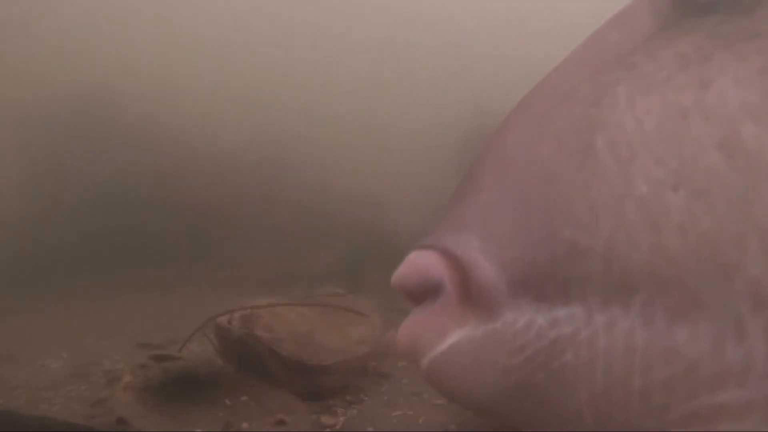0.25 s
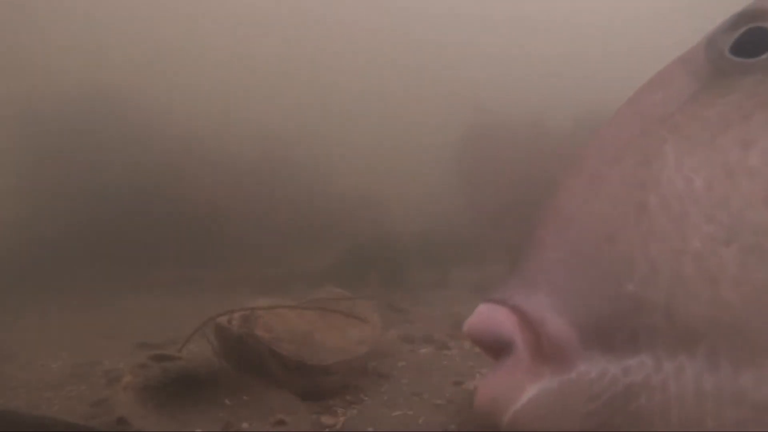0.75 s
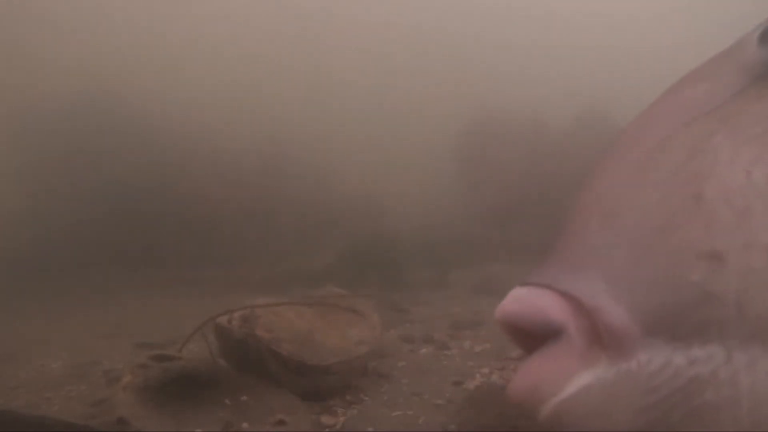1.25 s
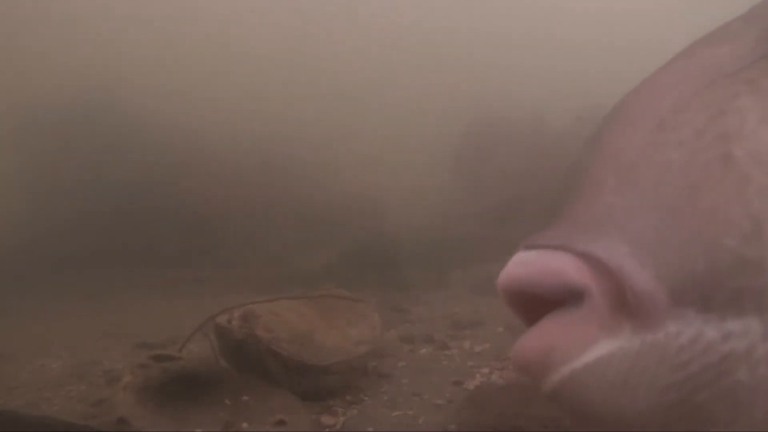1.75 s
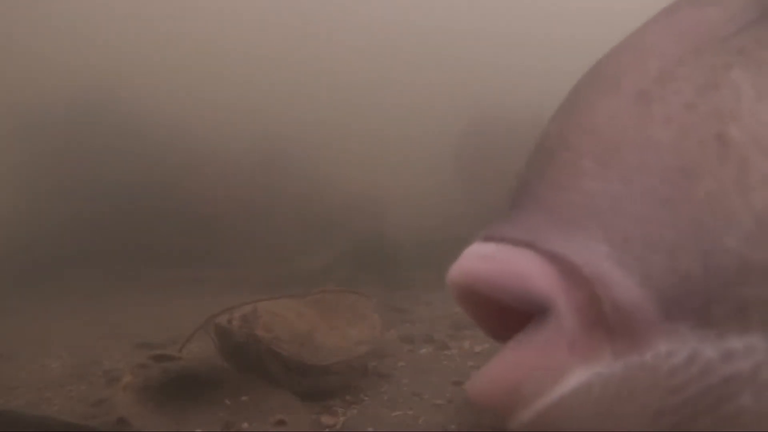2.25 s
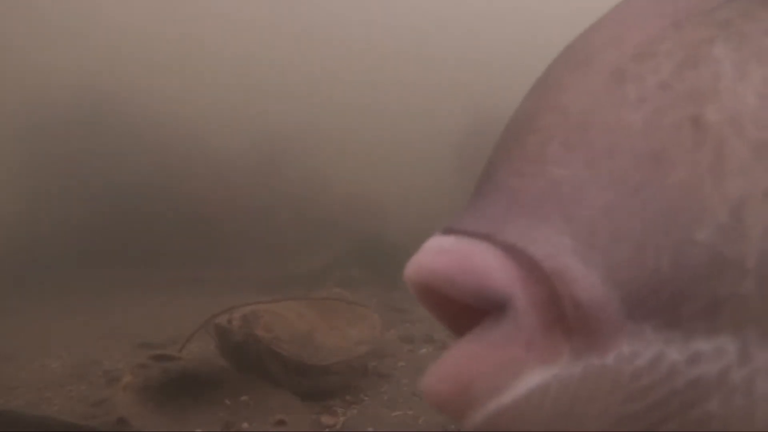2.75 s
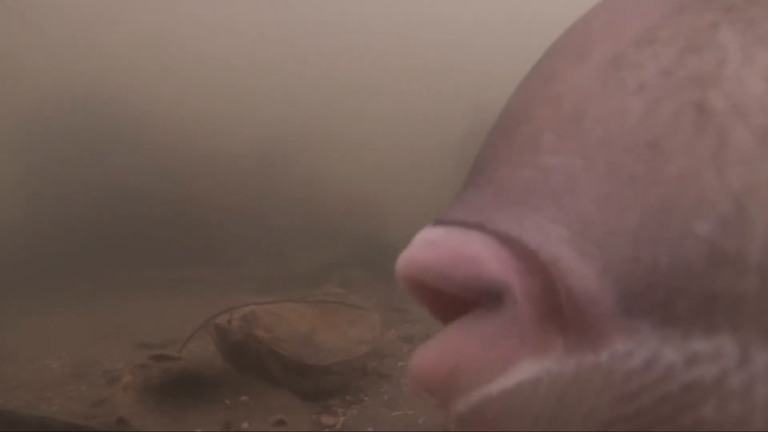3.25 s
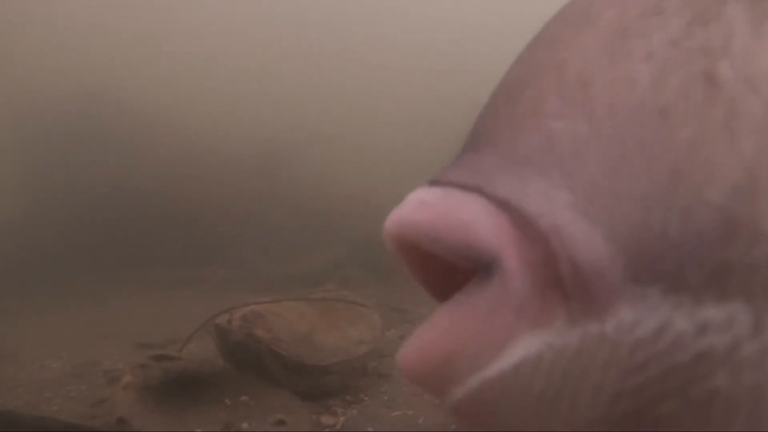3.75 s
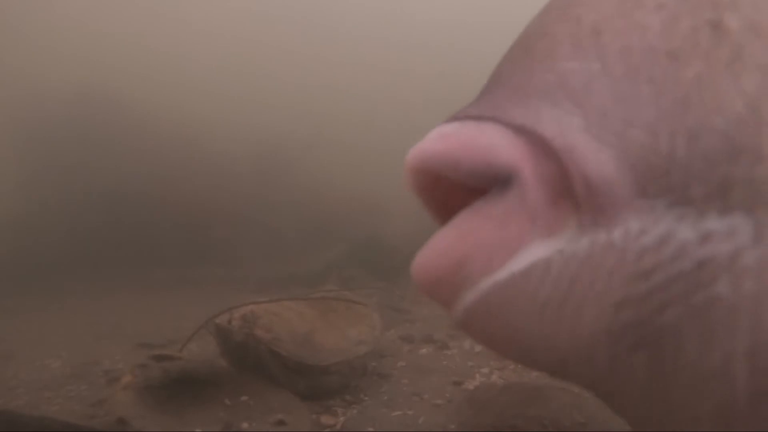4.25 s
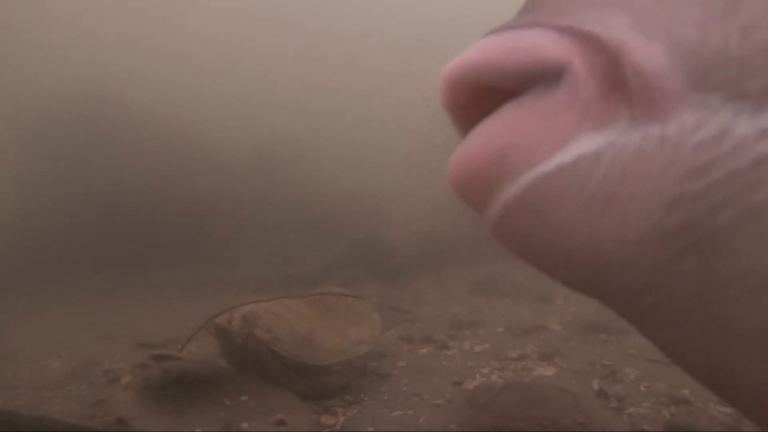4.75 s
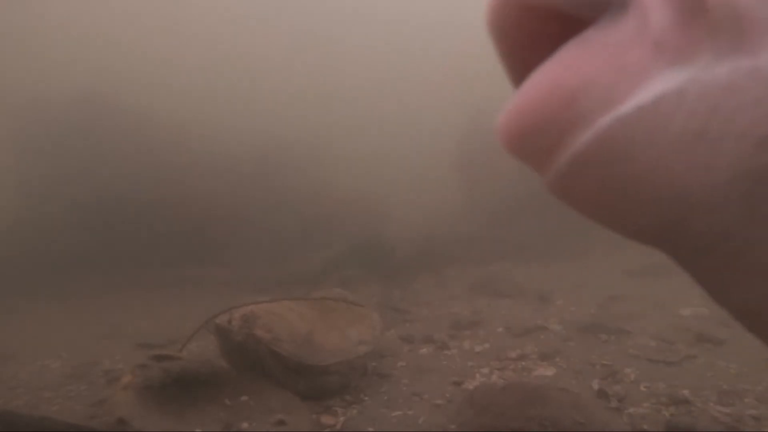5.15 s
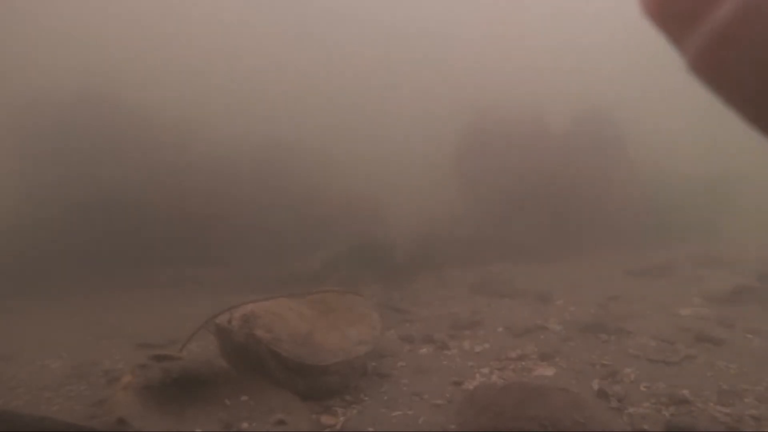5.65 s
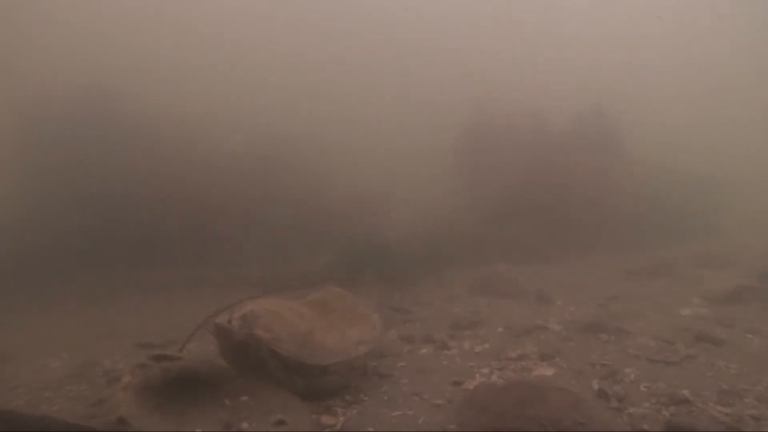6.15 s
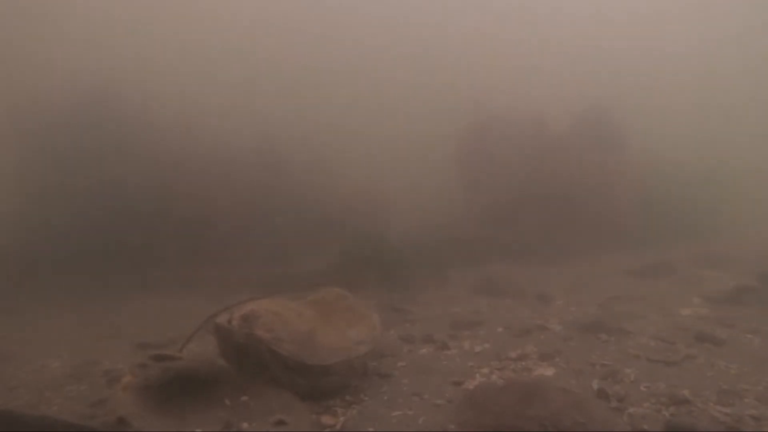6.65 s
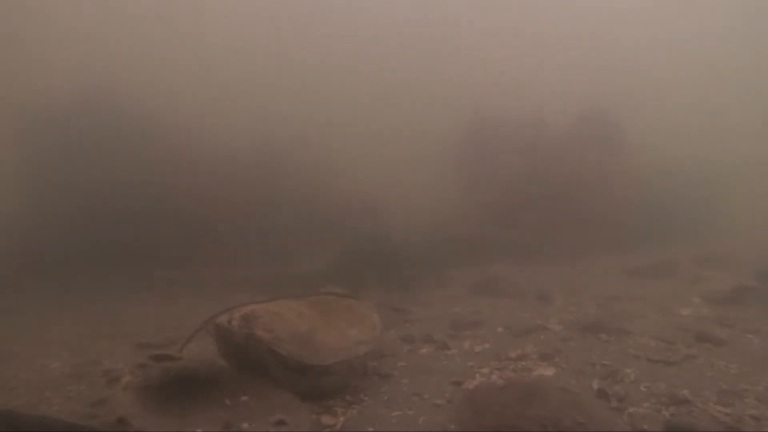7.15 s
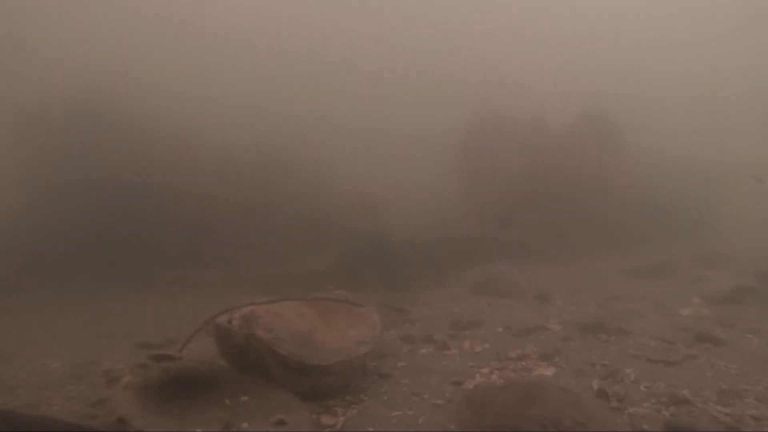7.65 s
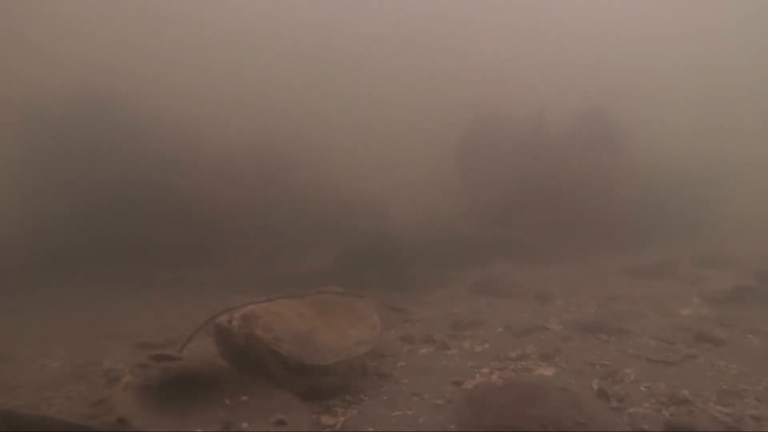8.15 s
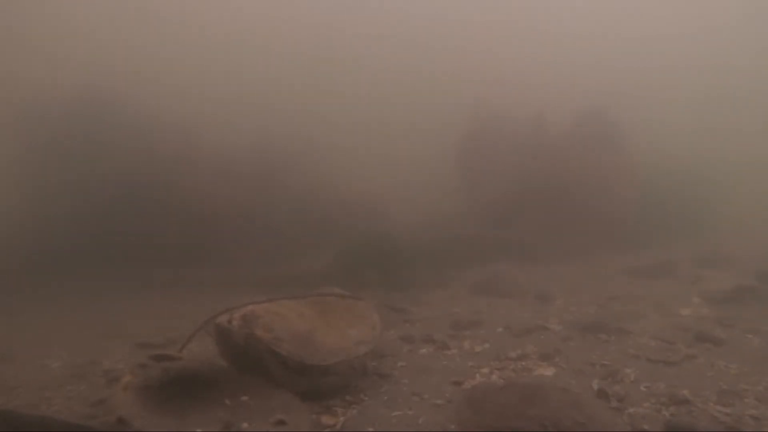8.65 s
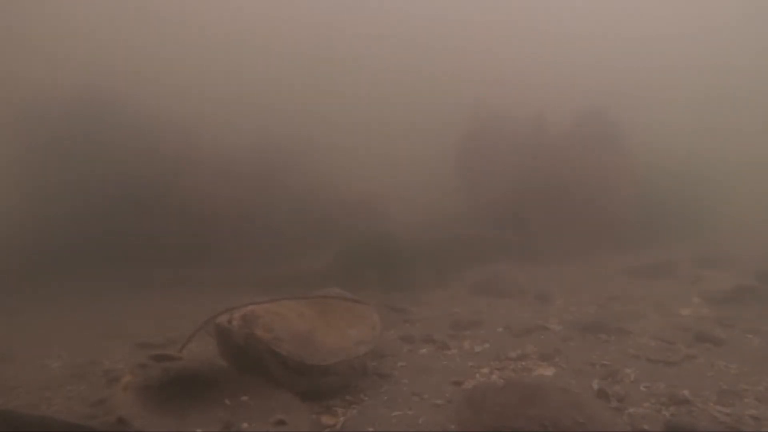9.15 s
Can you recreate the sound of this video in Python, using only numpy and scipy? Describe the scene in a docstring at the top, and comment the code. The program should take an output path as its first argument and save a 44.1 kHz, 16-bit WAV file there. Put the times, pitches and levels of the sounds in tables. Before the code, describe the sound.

Heard from inside a waterproof housing underwater: quiet muffled wash, then a sudden heavy bass thump as a boat engine starts. It shudders, jolts and settles to a low wavering hum. A rapidly throbbing, nasal propeller whine with airy fizz rises over it, peppered with short knocks and a few tiny bubble-like pings. After about five seconds the whine sinks and thins, leaving the hum and soft water. The big fish nearby makes no distinct sound.

```python
"""On a lake bed, a camera lies in a waterproof housing with two microphones, in a soft wash of water.
A boat motor kicks in with a loud low boom and settles to a hum, both built from sines of wandering pitch.
Its propeller wash is noise that surges with the shaft, combed by the surface echo; it rings the housing's
resonances in a hoarse whine and fizz that fade as the boat draws off. Knocks, pings and strands are short tones.
The housing rocks between the microphones, so they hear much of it in opposite phase."""
import sys
import numpy as np
from scipy import signal
from scipy.fft import rfft, irfft, next_fast_len
from scipy.io import wavfile

SR = 44100
rng = np.random.default_rng(int(sys.argv[2]) if len(sys.argv) > 2 else 0)


def materialize(psi):
    """Save the field psi as 16-bit PCM at rate SR to the path in sys.argv[1].

    A 1-D psi becomes a single channel; in a 2-D psi each row is a channel.
    """
    bounded = np.clip(np.atleast_2d(psi).T, -1, 1)
    quanta = np.round(bounded * 32767).astype(np.int16)
    wavfile.write(sys.argv[1], SR, quanta)


N = 414981
TIME = np.arange(N) / SR

START_S = 0.698  # the motor kicks in
BOOM_ATTACK_S = 0.12
LEAVES_S, LEAVING_S = 4.7, 2.2  # when the boat starts to draw off, and how long that takes


def undb(db):
    """Decibels to gain."""
    return 10 ** (np.asarray(db) / 20)


def unit(x):
    """Scale to rms 1."""
    return x / np.sqrt(np.mean(x ** 2))


def curves(table):
    """Each column after the first as a curve in time, joined by straight lines."""
    times_s, *columns = np.transpose(table)
    return [np.interp(TIME, times_s, column) for column in columns]


def ramp(start_s, length_s):
    """Rises from 0 to 1 and stays there."""
    return np.clip((TIME - start_s) / length_s, 0, 1)


def filtered(x, gain_at):
    """Complex signal of x after a filter; real and imaginary parts each have rms 1."""
    size = next_fast_len(N)
    frequencies = np.arange(1, size // 2 + 2) * SR / size
    spectrum = rfft(x, size) * gain_at(frequencies)
    in_phase = unit(irfft(spectrum, size)[:N])
    quadrature = unit(irfft(-1j * spectrum, size)[:N])
    return in_phase + 1j * quadrature


def noise(gain_at):
    """Filtered white noise, as a complex signal."""
    return filtered(rng.standard_normal(N), gain_at)


def coloured(spectrum):
    """Noise of rms 1 shaped by (f/Hz, level/dB) points, rolling off above the last one."""
    hz, db = np.transpose(spectrum)

    def gain_at(f):
        rolloff = 1 + (f / (2 * hz[-1])) ** 2
        return undb(np.interp(np.log(f), np.log(hz), db)) / rolloff

    return noise(gain_at).real


def resonance(hz, width_hz):
    """Gain against frequency of a steep-sided resonance; the gain is half at the edges of its width."""
    return lambda f: 1 / (1 + ((f / hz - hz / f) * hz / width_hz) ** 2)


def walk(rate_hz):
    """Smooth random drift with spread 1, slower than about rate_hz."""
    return noise(lambda f: np.exp(-(f / rate_hz) ** 2)).real


def pair(x, left_db, left_phase):
    """A complex signal at the left and right microphones; level and phase/rad are left against right."""
    left = (x * undb(left_db) * np.exp(1j * left_phase)).real
    return np.array([left, x.real])


def calmed(x, above_hz=1000, calm_db=-5):
    """The water sounds darker until the motor stirs it."""
    highpass = signal.butter(2, above_hz, "high", fs=SR, output="sos")
    bright = signal.sosfiltfilt(highpass, x)
    calm = 1 - ramp(START_S, BOOM_ATTACK_S)
    return x - bright * (1 - undb(calm_db)) * calm


# spectrum of the water that rocks the whole housing: f/Hz, relative level/dB
ROCK_SPECTRUM = [(120, -38), (200, 12), (290, -1), (400, 0), (520, -3.5), (800, 0.5), (1000, -7),
                 (1500, -10), (2200, -17.5), (3200, -63), (5000, -56.5)]
# spectrum of the low murmur that each microphone hears alone: f/Hz, relative level/dB
MURMUR_SPECTRUM = [(15, -11), (29, -2), (44, -12.5), (62, -6), (85, -15), (110, -9.5), (165, 0.5),
                   (205, -3), (260, -9), (420, -19.5), (900, -27), (1800, -27.5), (2900, -36), (4500, -41)]
# spectrum of the thin hiss that each microphone hears alone: f/Hz, relative level/dB
HISS_SPECTRUM = [(2000, -14.5), (3500, 5), (4700, -1.5), (6500, 5.5), (8000, -2), (10000, 0.5),
                 (13000, -6.5), (14500, -19), (15600, -21.5)]


def water(rock_db=-54.5, murmur_db=-52, hiss_db=-76, whistle_db=-93):
    """Moving water rocks the housing and murmurs at each microphone, under thin hiss and a faint high whistle."""
    def sway():
        return undb(1.1 * walk(6))

    opposite = np.array([[-.95], [1]])  # left against right
    rock = coloured(ROCK_SPECTRUM) * undb(rock_db) * sway() * opposite
    murmur = np.array([coloured(MURMUR_SPECTRUM) * sway() for _ in range(2)]) * undb(murmur_db)
    hiss = np.array([coloured(HISS_SPECTRUM) for _ in range(2)]) * undb(hiss_db + .5 * walk(14))
    whistle = noise(resonance(6505, 9)) * undb(whistle_db) * ramp(0, 6)
    return calmed(rock + murmur) + hiss + pair(whistle, -8.0, 0)


# faint steady buzz of the camera: f/Hz, peak level/dB at the right microphone
BUZZ_TONES = [(30, -71), (60, -73), (180, -64.5), (210, -70)]


def buzz():
    """The camera hums faintly inside its housing: a few steady sines."""
    tones = sum(undb(db) * np.exp(2j * np.pi * hz * TIME) for hz, db in BUZZ_TONES)
    return pair(tones, -2, 0)


# propeller shaft: t/s, speed/(turns per s)
SHAFT_SPEED = [(0, 11.65), (2.5, 11.7), (3.3, 11.6), (4, 11.8), (5.2, 11.78), (6.2, 11.72), (7, 11.76),
               (8, 11.68), (9.41, 11.86)]


def shaft_turns():
    """Turns of the propeller, summed from the shaft speed."""
    return .02 + np.cumsum(curves(SHAFT_SPEED)[0]) / SR


# work of the two blades with the boat near: first surge/dB, second surge/dB (before churn depth), slap/dB
NEAR_BLADES = (4.5, .5, -14)
# the same with the boat far: same columns
FAR_BLADES = (8.5, -1.5, -6)


def blades():
    """First surge, second surge and slap in dB: the beat grows more lopsided as the boat leaves."""
    gone = ramp(LEAVES_S, LEAVING_S)
    return [near + (far - near) * gone for near, far in zip(NEAR_BLADES, FAR_BLADES)]


def churn(depth):
    """Noise of the propeller: each of the two blades gives one surge a turn."""
    first_db, second_db, _ = blades()
    swing = np.cos(2 * np.pi * shaft_turns())
    first_surge = first_db * np.exp(2 * (swing - 1))
    second_surge = second_db * np.exp(-3 * (swing + 1))
    unevenness = 1.3 * walk(60)
    return rng.standard_normal(N) * undb(depth * (first_surge + second_surge + unevenness))


def slaps():
    """One pressure pulse a turn from the stronger blade, a little uneven in time and size."""
    at = np.flatnonzero(np.diff(np.floor(shaft_turns())))
    late, loud = rng.standard_normal((len(at), 2)).T
    at = np.clip(at + (late * .0035 * SR).astype(int), 0, N - 1)
    pulses = np.zeros(N)
    # at 0 dB a slap carries as much energy as a whole turn of plain churning
    pulses[at] = np.sqrt(N / len(at)) * undb(blades()[2][at] + 2 * loud)
    return pulses


# path to the moving boat: t/s, lag of surface echo/ms, level of that echo/dB, tilt of the whine/(dB per octave)
BOAT_PATH = [(.4, 3.31, -15.5, 21.5), (1.1, 3.99, -14, -9.5), (1.9, 3.71, -8, -5), (2.35, 3.85, -13, -4),
             (2.7, 3.8, -19, 7), (3.3, 4.36, -14.5, 12.5), (4, 4.09, -7.5, -19), (4.55, 4.5, -5.5, -15),
             (5.1, 4.92, -8.5, 3), (5.8, 5.71, -17.5, -10), (6.3, 5.98, -15.5, 21), (7.1, 6.13, -8.5, -15),
             (8.2, 6.21, -5.5, 3), (9.1, 6.16, -12.5, -13)]


def surface_echo(x):
    """The surface mirrors the sound upside down; as the lag grows, peaks and notches slide down through the whine."""
    lag_ms, echo_db, _ = curves(BOAT_PATH)
    mirrored = np.interp(TIME - lag_ms / 1000, TIME, x)
    return x - undb(echo_db) * mirrored


def housing(x, modes, shift_hz=0):
    """The housing's resonances, driven by x and bent by shift_hz, at both microphones."""
    bend = np.exp(2j * np.pi * np.cumsum(shift_hz) / SR)
    out = 0
    for hz, width_hz, db, left_db, left_phase in modes:
        ringing = filtered(x, resonance(hz, width_hz)) * bend * undb(db)
        out = out + pair(ringing, left_db, left_phase)
    return out


def swell(start_s, attack_s, rise_db, sag_db_per_s, drop_s, release_s, drop_db):
    """Envelope in dB under its peak: it rises, sags slowly and drops a step."""
    sag_db = sag_db_per_s * np.maximum(TIME - start_s - attack_s, 0)
    return rise_db * (ramp(start_s, attack_s) - 1) - sag_db - drop_db * ramp(drop_s, release_s)


# drive of the whine, before each resonance's level and the tilt: t/s, level/dB
WASH_LEVEL = [(0, -62.5), (.45, -61.5), (.9, -49), (1.3, -41), (1.55, -40.5), (1.9, -41), (2.7, -41.5),
              (3.2, -43), (3.9, -44), (4.7, -50), (5.2, -49), (6.2, -59), (7, -54), (8.4, -57), (8.9, -53),
              (9.4, -55.5)]
# housing resonances that whine: f/Hz, width/Hz, relative level/dB, left minus right/dB, left phase/rad
WHINE_RESONANCES = [(510, 91, -12.5, -3, -3.0), (608.6, 42, -4.5, -11.5, -2.5), (662, 44.4, -4, -24, -5),
                    (720.4, 52, -6.5, -7, -1), (778.7, 38.7, -6, -4.5, -1.5), (823, 110, -11, -6.5, -2.5)]
# drive of the housing's high ring, before each resonance's level: t/s, level/dB
HIGH_RING_LEVEL = [(0, -75.5), (.52, -75.5), (.57, -69.5), (.93, -63), (1.2, -55), (2.9, -56.5), (3.7, -59),
                   (5.05, -58), (5.6, -63), (6.6, -63.5), (7.5, -72.5), (8.25, -72.5), (8.45, -76),
                   (9.4, -79)]
# the housing's high ring: f/Hz, width/Hz, relative level/dB, left minus right/dB, left phase/rad
HIGH_RING_RESONANCES = [(2532, 277, 1.4, -2, 2.07), (3243, 330, -15.5, -0.27, 1.1)]
# housing resonances that fizz, in four groups from low to high, each with rows of
# f/Hz, width/Hz, relative level/dB, left minus right/dB, left phase/rad
FIZZ_RESONANCES = [
    [(333, 82, 2.5, -0.62, 2.5), (960, 450, -9, -0.074, -2.5), (1195, 130, -4, 0.35, -2.5)],
    [(1503, 120, -8, -6.5, 2.7), (1720, 250, -5.5, -1.5, 3.1)],
    [(2028, 190, -1.8, -3.5, 2.25)],
    [(3830, 180, -13, 0.5, 1.73), (4366, 640, -10.5, 1, -0.74), (5460, 480, -12.5, -7.5, -1.4),
     (6400, 940, -18, 10.5, -1.3)],
]
# drive of each fizz group, before each resonance's level:
# idle level/dB, peak level/dB, attack/s, sag/(dB per s), drop as the boat leaves/dB
FIZZ_DRIVE = [(-80, -57, 0.51, 2, 6), (-80, -55, 0.37, 1.14, 25), (-99, -58, 2.5, 2.5, 10.5),
              (-91, -63.5, 0.55, 1.26, 8)]
FIZZ_SWELL_DB, FIZZ_DROP_S, FIZZ_RELEASE_S = 11.5, 5.16, 0.97
WHINE_SAG_HZ = 16  # how far the whine sinks once the boat leaves


def propeller(waver_db=0.63, ring_wander_hz=35):
    """The throbbing wash rings the housing: a whine heard with its surface echo, a high ring and fizz."""
    def sweep(f):
        # the low part of each surge arrives first, so it chirps upward through the whine; it holds little treble
        chirp = np.exp(-1j * np.pi * 8e-5 * (np.minimum(f, 950) - 660) ** 2)
        return chirp / (1 + (f / 900) ** 36)

    surges = filtered(churn(0.88) + slaps(), sweep).real
    fizz = churn(.6)
    arriving = surface_echo(surges)
    wash_db = curves(WASH_LEVEL)[0]
    tilt_db = curves(BOAT_PATH)[2]  # per octave, about 680 Hz
    sag_hz = -WHINE_SAG_HZ * ramp(LEAVES_S, 2 * LEAVING_S)
    out = 0
    for mode in WHINE_RESONANCES:
        drive_db = wash_db + tilt_db * np.log2(mode[0] / 680)
        out = out + housing(arriving, [mode], sag_hz) * undb(drive_db)

    high_ring = housing(fizz, HIGH_RING_RESONANCES, ring_wander_hz * walk(9))
    out = out + high_ring * undb(curves(HIGH_RING_LEVEL)[0] + waver_db * walk(25))

    running = ramp(START_S, 0.027)
    for modes, (idle_db, peak_db, attack_s, sag, drop_db) in zip(FIZZ_RESONANCES, FIZZ_DRIVE):
        envelope_db = swell(START_S, attack_s, FIZZ_SWELL_DB, sag, FIZZ_DROP_S, FIZZ_RELEASE_S, drop_db)
        drive = (1 - running) * undb(idle_db) + running * undb(peak_db + envelope_db)
        out = out + housing(fizz, modes) * drive
    return out


# hard knocks and short buffets of the wash on the housing:
# t/s, level before the rise and fade/dB, f at the onset/Hz, length of the push/s
HOUSING_KNOCKS = [(.575, -45, 650, .006), (.961, -36, 638, .005), (1.01, -29.5, 665, .008),
                  (1.141, -34, 651, .007), (1.264, -33, 603, .012), (1.445, -32, 595, .007),
                  (1.465, -34, 625, .028), (1.516, -30.5, 659, .018), (1.543, -30.5, 648, .028),
                  (1.6, -32, 650, .032), (1.675, -34, 645, .032), (1.77, -33.5, 640, .036),
                  (1.822, -31.5, 662, .009), (1.845, -30.5, 645, .038), (1.945, -34.5, 650, .012),
                  (1.967, -30.5, 645, .022), (2.035, -34.5, 630, .036), (2.126, -32.5, 649, .009),
                  (2.209, -33, 619, .008), (2.229, -34.5, 655, .026), (2.286, -33, 722, .024),
                  (2.324, -33, 720, .018), (2.376, -34.5, 610, .02), (2.426, -31.5, 665, .006),
                  (2.636, -34, 697, .007), (3.967, -35, 598, .007), (5.132, -38, 678, .007),
                  (5.381, -39, 680, .009), (8.787, -43, 640, .012)]


def knocks(tick_db=-26, rise_s=.0018, decay_s=.004, glide_hz_per_s=600):
    """Each knock rings the housing while it pushes, bending slightly upward, and dies at once; mostly on the right."""
    out = np.zeros(N, complex)
    age = np.arange(SR // 10) / SR
    tick_hz = HIGH_RING_RESONANCES[0][0]
    tick = undb(tick_db) * np.exp(2j * np.pi * tick_hz * age - age / decay_s)
    for s, db, hz, push_s in HOUSING_KNOCKS:
        fade = np.exp(-np.maximum(age - push_s, 0) / decay_s) * (1 - np.exp(-age / rise_s))
        ring = np.exp(2j * np.pi * (hz + glide_hz_per_s * age / 2) * age) + tick
        start = int(s * SR)
        out[start:start + len(age)] += undb(db) * ring * fade
    return pair(out, -21, -1.2)


# motor speed before its random wobble: t/s, f/Hz
MOTOR_SPEED = [(.72, 116), (.93, 123), (1.035, 131), (1.065, 139), (1.125, 121), (1.18, 123), (1.245, 144),
               (1.29, 134), (1.35, 144), (1.4, 131), (1.45, 140), (3.2, 135.5), (5, 139.3), (6.9, 141.9),
               (9.4, 140.5)]
# the boom as the motor kicks in: hold, sag, quick release
BOOM_HOLD_S, BOOM_END_S, BOOM_RELEASE_S = 0.23, 1.11, 0.018
BOOM_DB, BOOM_SAG_DB_PER_S, BOOM_FLUTTER_DB = -17, 36, .45
BOOM_DIP_S, BOOM_DIP_LENGTH_S, BOOM_DIP_DB = 1.058, 0.033, -1  # it falters once on the way down
# it labours on, gives a last jolt and settles to a slowly fading hum
LABOUR_DB, JOLT_S, JOLT_LENGTH_S, JOLT_DB = -36.5, 1.4, 0.021, 5.5
HUM_DB, HUM_FADE_DB_PER_S = -44, 0.24


def motor(rumble_db=-44.0, rumble_follow=0.52, half_order_db=-21, lope_db=-31, sway_db=2.0,
          burr_db=-14, burr_hz=178, waver_db=1.0, shudder_db=2.0, throb_db=1.1, wobble_hz=2.6):
    """The motor booms and rumbles as it runs up under load, then hums, throbbing with the shaft, under a soft burr."""
    running = np.sin(np.pi / 2 * ramp(START_S, BOOM_ATTACK_S)) ** 2.0
    eased = ramp(BOOM_END_S, BOOM_RELEASE_S)
    settled = ramp(JOLT_S, 0.089)
    labouring = eased - settled

    boom_db = BOOM_DB - BOOM_SAG_DB_PER_S * np.maximum(TIME - START_S - BOOM_HOLD_S, 0)
    boom_db = boom_db + BOOM_DIP_DB * np.exp(-((TIME - BOOM_DIP_S) / BOOM_DIP_LENGTH_S) ** 2)
    jolt_db = JOLT_DB * np.exp(-((TIME - JOLT_S) / JOLT_LENGTH_S) ** 2)
    hum_db = HUM_DB - HUM_FADE_DB_PER_S * (TIME - JOLT_S)
    level_db = (1 - eased) * boom_db + labouring * LABOUR_DB + settled * hum_db + jolt_db

    pitch_hz = curves(MOTOR_SPEED)[0] + wobble_hz * eased * walk(16.8)
    angle = 2 * np.pi * np.cumsum(pitch_hz) / SR
    tone = np.exp(1j * angle) + undb(half_order_db) * eased * np.exp(.5j * angle)
    # under load every other cycle is stronger
    tone = tone + undb(lope_db) * (1 - eased) * 2 * np.cos(angle / 2) * np.exp(1j * angle)

    throb = throb_db * np.cos(2 * np.pi * shaft_turns())
    level_db = level_db + settled * (sway_db * walk(4.4) + throb)
    level_db = level_db + BOOM_FLUTTER_DB * (1 - eased) * walk(40)
    hum = tone * undb(level_db + (shudder_db * labouring + waver_db * settled) * walk(22))
    burr = noise(resonance(burr_hz, 65)) * undb(hum_db + burr_db) * eased
    rumble_level_db = rumble_db + rumble_follow * (level_db - BOOM_DB)
    rumble = noise(resonance(70, 54)) * undb(rumble_level_db) * (1 - settled)
    heard = pair(hum, -3.6 - 2.7 * settled, -.3 - .5 * settled)
    return running * (heard + pair(burr, -17, 1.0) + pair(rumble, -1.8, 0))


# small high pings, probably bubbles: t/s, peak level/dB at the right microphone, f at the onset/Hz, decay/s
HIGH_PINGS = [(1.0, -56, 3130, 0.0076), (1.178, -52, 3270, .014), (1.351, -56, 3000, 0.0073),
              (6.565, -63, 3260, .008), (7.01, -64, 3320, .01)]


def pings(glide_hz_per_s=2500, rise_s=0.0018):
    """Short high pings that glide up as they die."""
    out = np.zeros(N, complex)
    age = np.arange(SR // 5) / SR
    for s, db, hz, decay_s in HIGH_PINGS:
        fade = np.exp(-age / decay_s) * (1 - np.exp(-age / rise_s))
        tone = np.exp(2j * np.pi * (hz + glide_hz_per_s * age / 2) * age)
        start = int(s * SR)
        out[start:start + len(age)] += undb(db) * fade / fade.max() * tone
    return pair(out, -8.0, 1)


# firm strands of the whine: t of the middle/s, time from middle to either end/s, f before waver/Hz,
# rms level at the middle before flutter/dB at the right microphone, left minus right/dB
WHINE_STRANDS = [(1.36, 0.26, 601, -45.5, -12), (2.2, 0.4, 601, -46, -10), (3.055, 0.33, 782, -46, -9),
                 (3.45, 0.53, 767, -49, -7), (3.947, 0.37, 634, -51.5, -17), (5.15, 0.4, 688, -51.5, -13)]


def strands(waver_hz=4, flutter_db=3.0):
    """Now and then one resonance sings out of the whine as a wavering tone."""
    out = 0
    waver = waver_hz * walk(12)
    flutter = undb(flutter_db * walk(35))
    for s, half_s, hz, db, left_db in WHINE_STRANDS:
        arch = np.cos(np.pi / 2 * np.clip((TIME - s) / half_s, -1, 1)) ** 2
        tone = np.exp(2j * np.pi * np.cumsum(hz + waver) / SR)
        out = out + pair(tone * arch * flutter * undb(db), left_db, -2.33)
    return np.sqrt(2) * out  # a sine's peak is this much above its rms


def scene():
    """Water, camera and boat together at the two microphones."""
    return water() + buzz() + propeller() + knocks() + motor() + pings() + strands()


TOP_HZ = 15400


def record(dry):
    """The camera cuts the top with a steep lowpass."""
    lowpass = signal.ellip(8, .2, 70, TOP_HZ, fs=SR, output="sos")
    return signal.sosfilt(lowpass, dry)


dry = scene()
out = record(dry)
materialize(out)
```